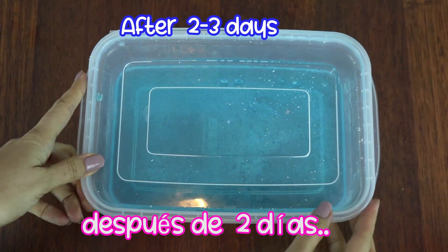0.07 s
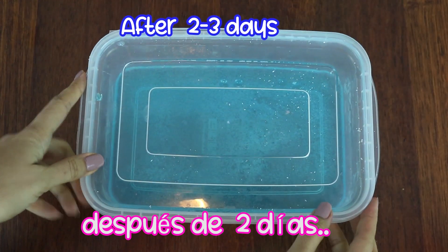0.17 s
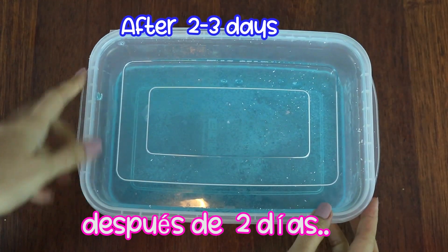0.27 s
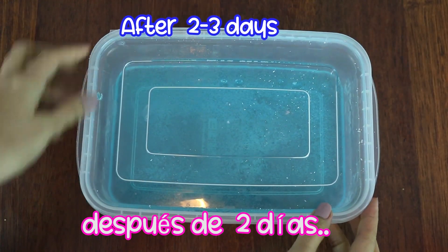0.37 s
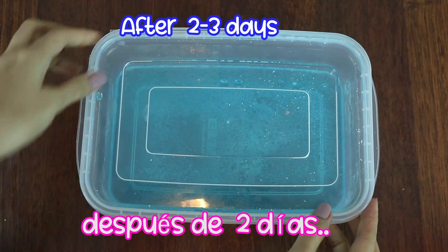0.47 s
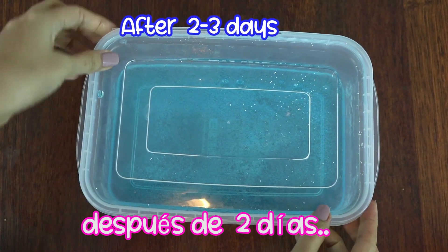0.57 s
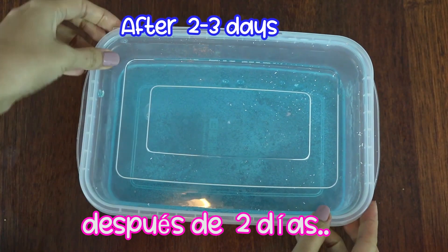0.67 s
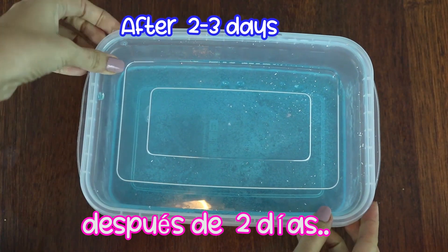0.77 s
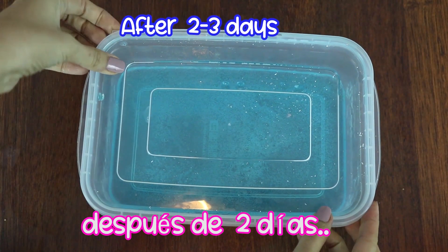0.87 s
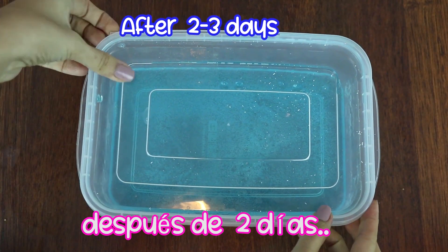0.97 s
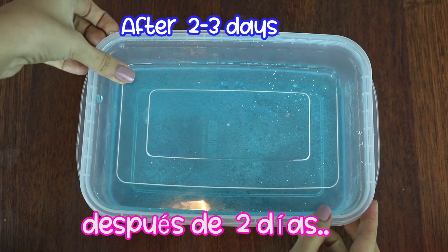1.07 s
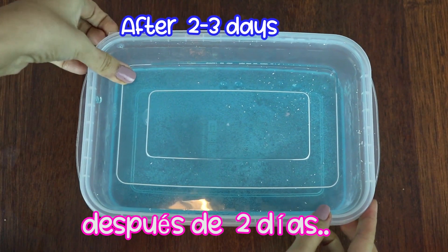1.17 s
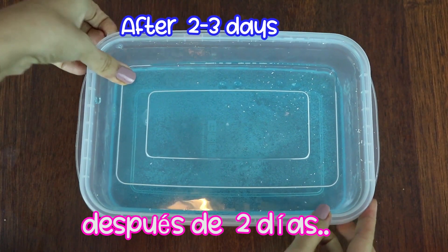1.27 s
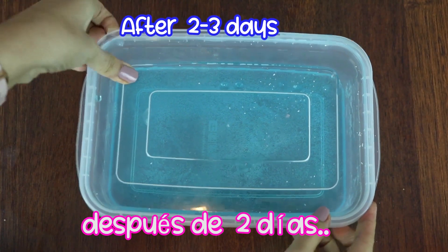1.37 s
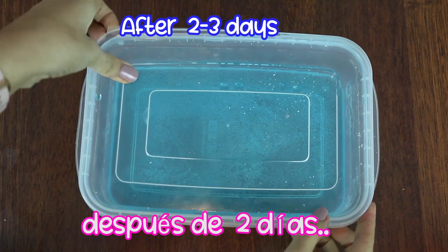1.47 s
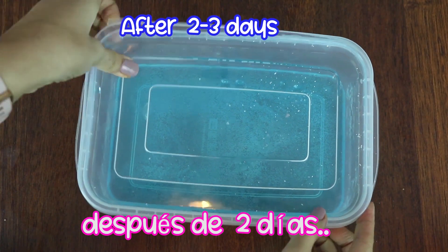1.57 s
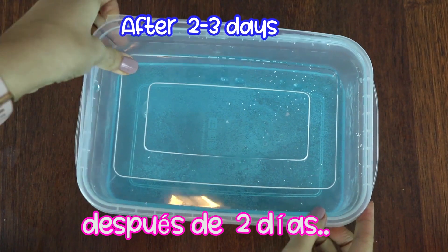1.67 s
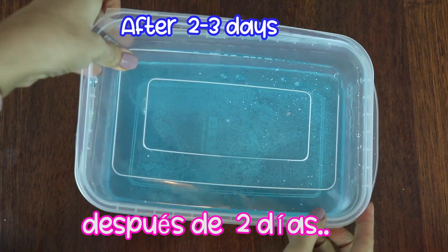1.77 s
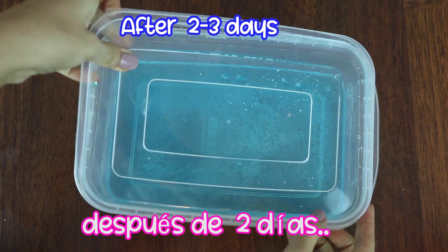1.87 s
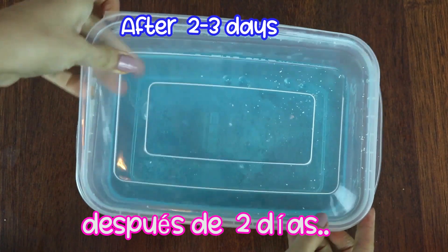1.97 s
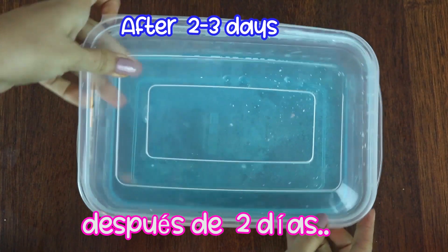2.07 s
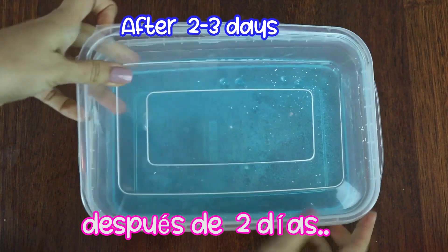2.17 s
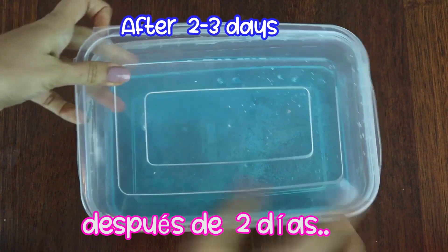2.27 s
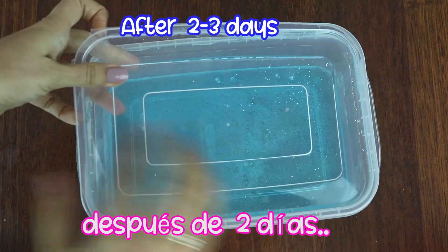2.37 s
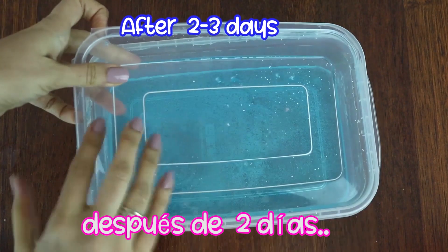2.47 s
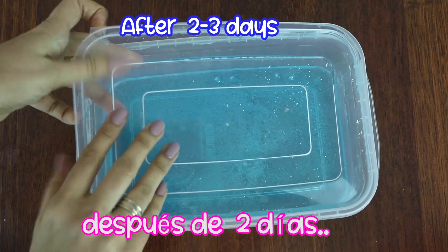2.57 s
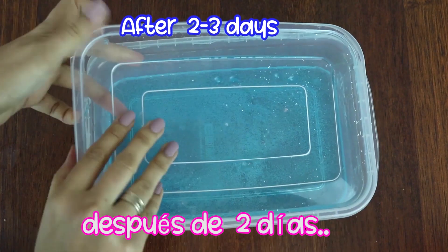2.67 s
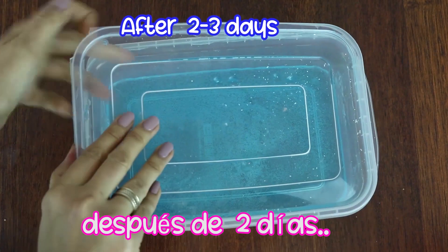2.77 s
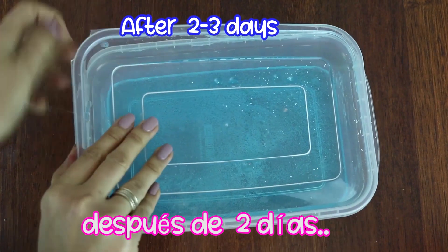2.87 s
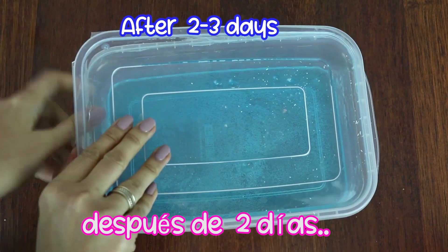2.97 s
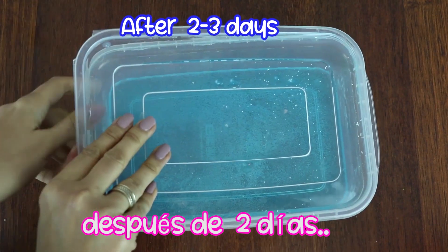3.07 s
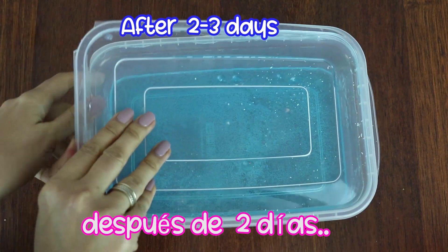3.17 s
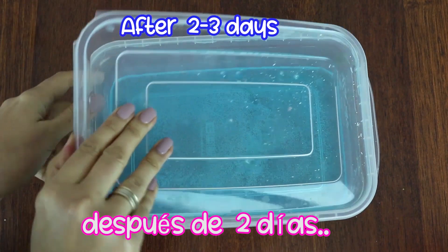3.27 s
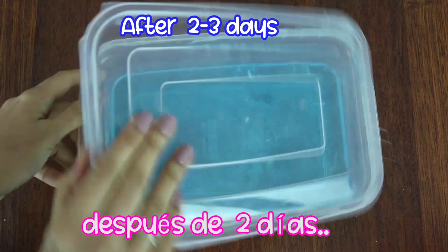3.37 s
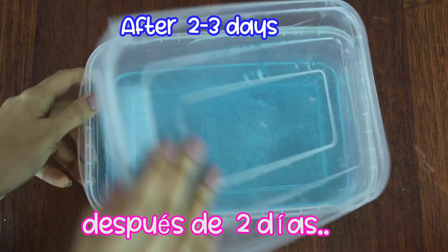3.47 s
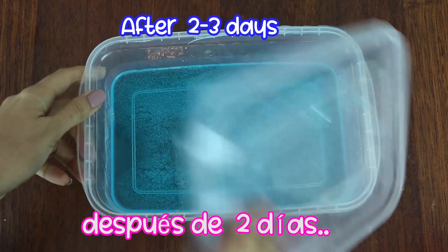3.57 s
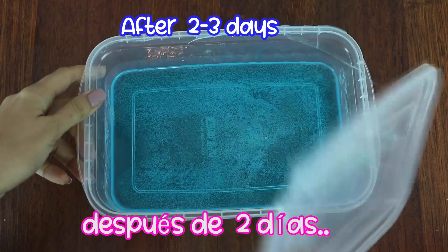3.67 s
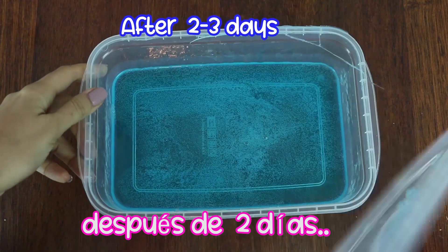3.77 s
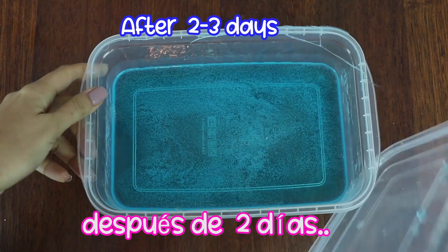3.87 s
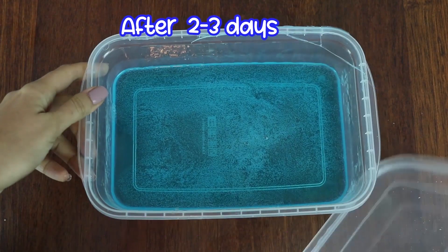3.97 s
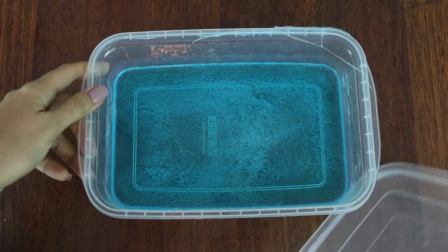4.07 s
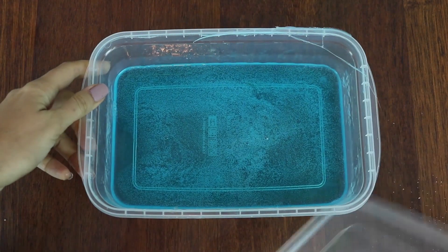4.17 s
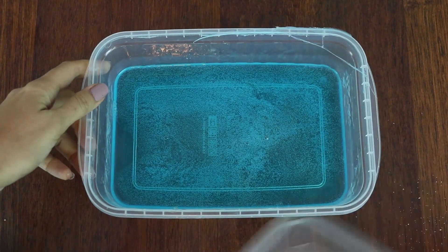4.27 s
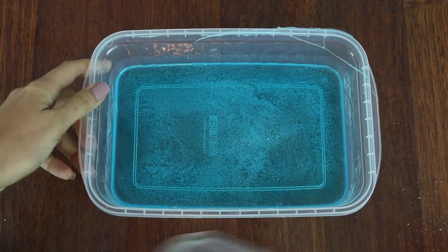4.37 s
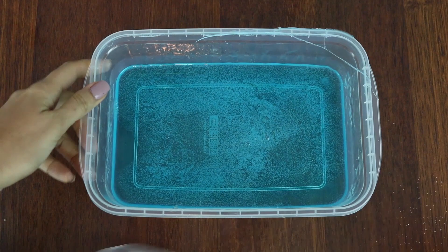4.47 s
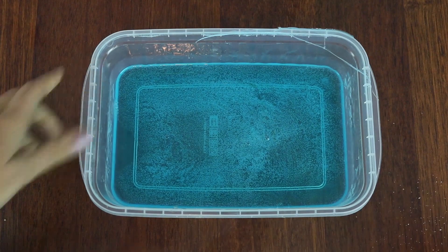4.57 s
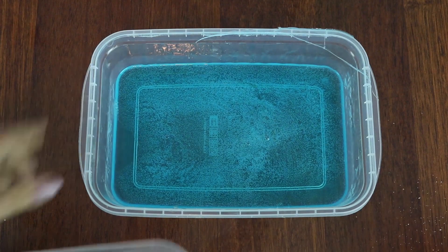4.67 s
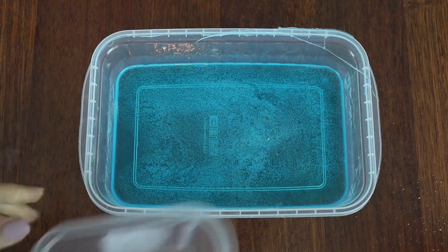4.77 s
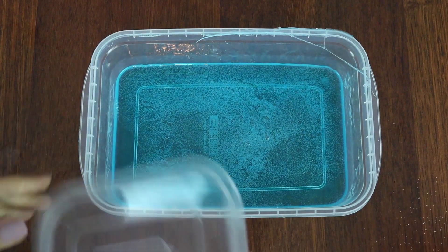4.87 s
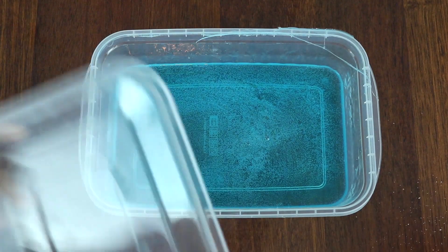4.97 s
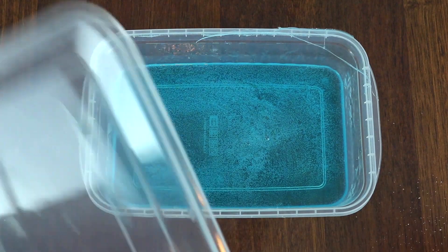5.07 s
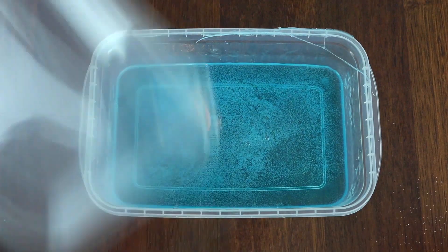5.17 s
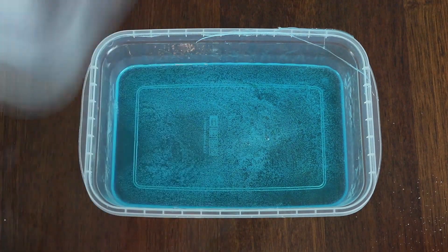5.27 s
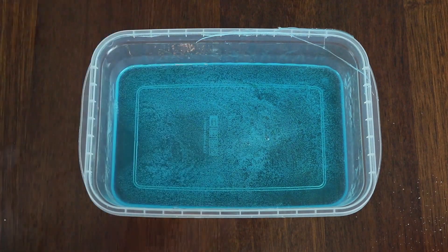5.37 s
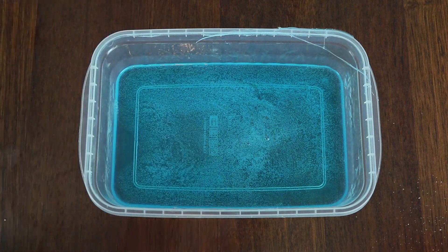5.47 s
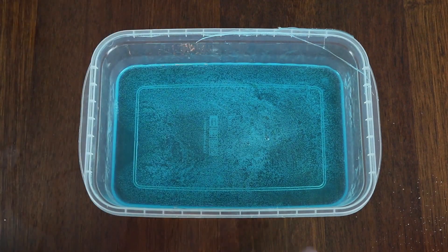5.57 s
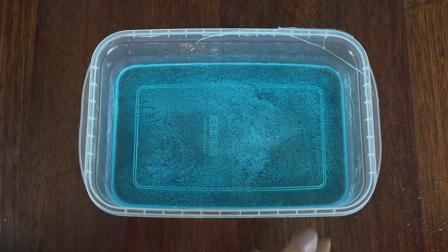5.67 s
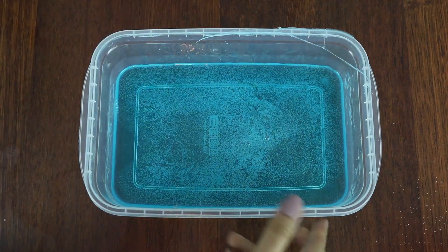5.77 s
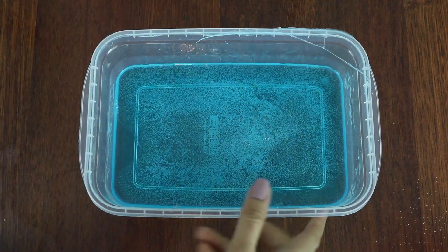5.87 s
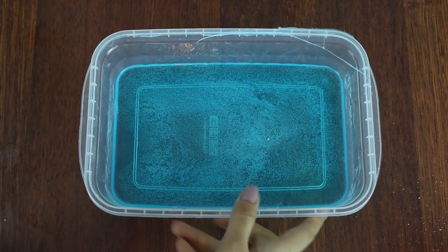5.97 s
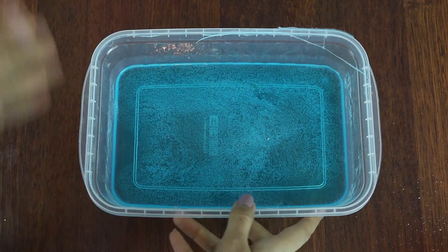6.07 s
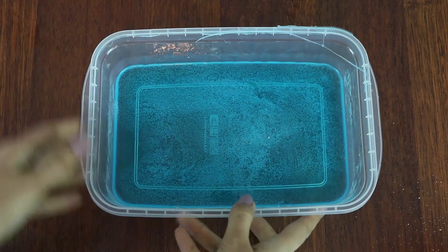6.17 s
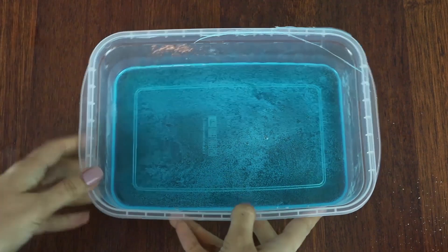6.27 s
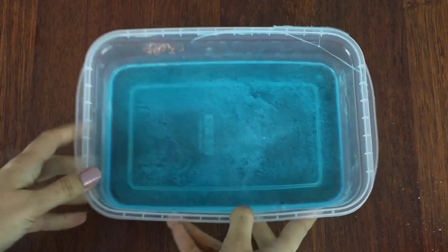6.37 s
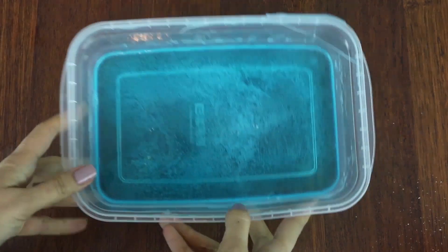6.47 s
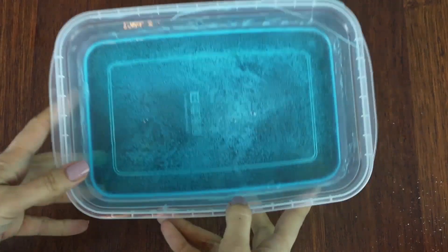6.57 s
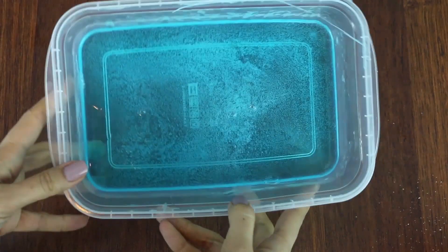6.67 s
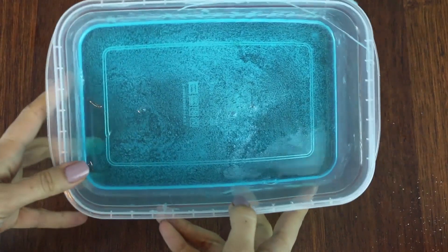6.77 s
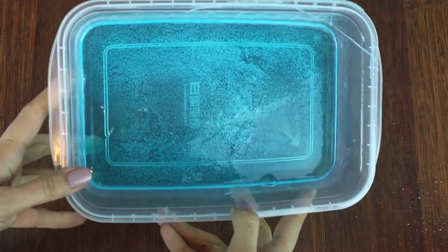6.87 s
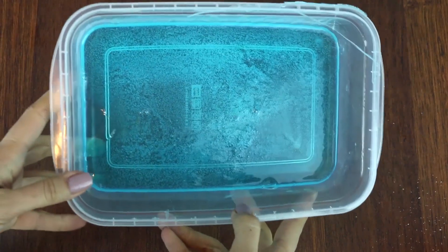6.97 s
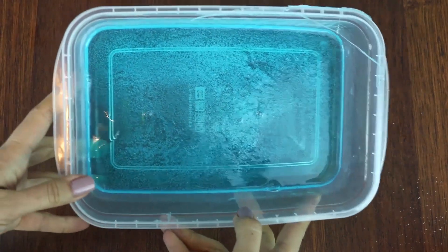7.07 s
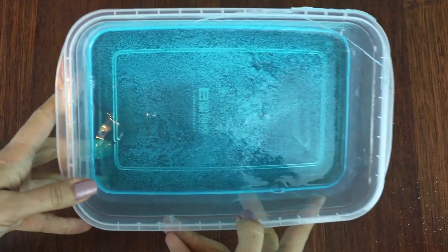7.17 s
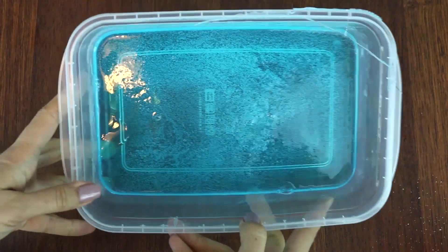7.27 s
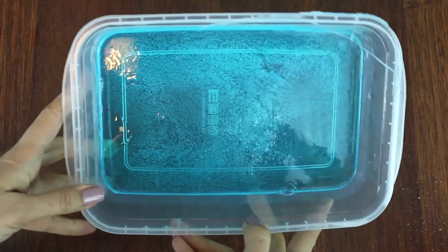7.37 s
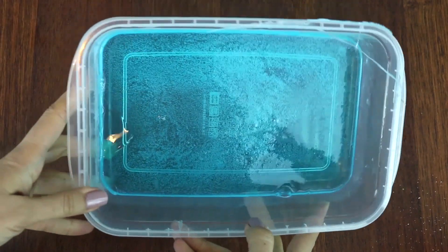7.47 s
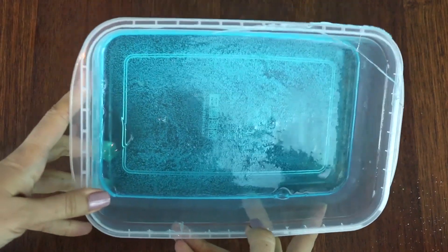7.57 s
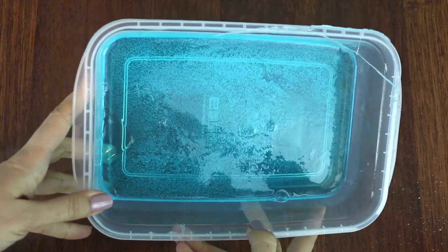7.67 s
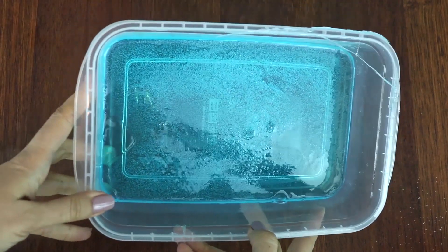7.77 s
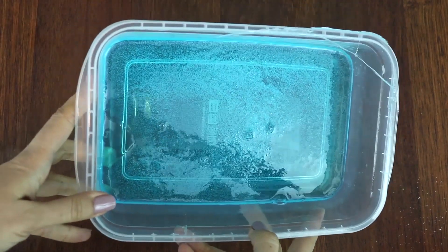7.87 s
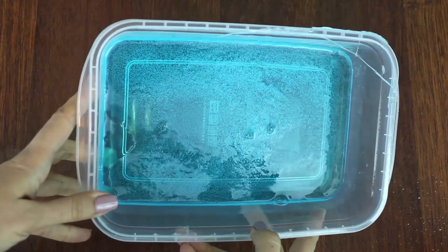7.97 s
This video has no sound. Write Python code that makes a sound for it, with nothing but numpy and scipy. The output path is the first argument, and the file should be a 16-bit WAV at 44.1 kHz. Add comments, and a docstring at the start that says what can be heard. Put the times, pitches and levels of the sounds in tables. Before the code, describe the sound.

A close microphone in a bare, hard room with low, steady hiss. From 0 to 1.5 s fingers touch a thin plastic lid: soft hollow taps, tiny ticks and faint rubbing. A firmer double pop comes at 1.6 s, small knocks around 1.9 s, and a sharper click at 2.4 s. Light fumbling continues until a short grainy squeak at 3.25 s, then the lid snaps off at 3.45 s: a very loud, slightly clipped crack with a rapid rattle lasting about a tenth of a second. Clacks at 3.6 to 3.7 s and scattered plastic knocks with skin rustle follow through 4.7 s. Softer ticks come near 5.1 s, then hard, bright clacks at 5.5 and 5.75 s, and a loud ringing double click at 5.95 s. After 6.3 s only faint rubs and tiny tub taps remain, the last near 7.9 s, over hiss.

```python
"""A snap-on lid is pried off a thin plastic tub on a wooden table, lifted away, flexed and dropped aside.
Each contact rings damped modes of lid and table, and adds noise bursts for rim click and seal crack.
Taps ring the tub wall; fingers rub the plastic as grainy stick-slip noise and squeak in narrow bands.
A bare hard room answers as decaying noise, over a quiet hiss; the input clips near full scale."""
import sys
import numpy as np
from scipy import signal
from scipy.fft import rfft, irfft, next_fast_len
from scipy.io import wavfile
from scipy.ndimage import map_coordinates

SR = 44100
rng = np.random.default_rng(int(sys.argv[2]) if len(sys.argv) > 2 else 0)


def inscribe(sig):
    """Save sig as 16-bit PCM at rate SR to the path in sys.argv[1].

    A 1-D sig is mono; a 2-D sig holds one channel per row.
    Samples are clipped to [-1, 1] before scaling.
    """
    pcm = np.round(np.clip(np.atleast_2d(sig).T, -1, 1) * 32767)
    wavfile.write(sys.argv[1], SR, pcm.astype(np.int16))


N = 353682

# Spectrum of the rim click. Each row: frequency in Hz, relative level in dB.
RIM_CLICK = [(350, -20.5), (800, -2), (1300, -2), (1900, -1.5), (2600, -8.5), (4500, -34.5)]
# Spectrum of the seal crack. Each row: frequency in Hz, relative level in dB.
SEAL_CRACK = [(1500, -39.5), (2800, 0), (4700, 3.5), (7000, -2.5), (11000, -34.5)]


def amp(db):
    """Amplitude ratio: 20 dB is a factor of ten."""
    return 10 ** (np.asarray(db) / 20)


def unit(x):
    """Normalisation by signal power: x scaled to rms 1."""
    return x / np.sqrt(np.mean(x ** 2) + 1e-20)


def along(points, hz):
    """Interpolation of (Hz, value) points on a logarithmic frequency axis."""
    f, v = np.transpose(points)
    return np.interp(np.log(hz + 1), np.log(f + 1), v)


def filtered(x, response):
    """Linear filtering: the spectrum of x times a complex response of frequency."""
    m = next_fast_len(x.shape[-1] + 8192)  # padding keeps the filter's end off the start
    hz = np.fft.rfftfreq(m, 1 / SR)
    return irfft(rfft(x, m) * response(hz), m)[..., :x.shape[-1]]


def noise(spectrum, shape):
    """Coloured noise of rms 1: white noise shaped by a spectrum of (Hz, dB)."""
    white = rng.standard_normal(shape)
    return unit(filtered(white, lambda hz: amp(along(spectrum, hz))))


def wobble(rate):
    """Slow random modulation: a smooth curve through random knots, rate knots a second."""
    knots = rng.standard_normal(int(N * rate / SR) + 4)
    return map_coordinates(knots, [np.arange(N) * rate / SR])


def stroke(start, length):
    """Envelope of sliding friction: the skin catches quickly, slides and lets go (seconds)."""
    progress = np.clip((np.arange(N) / SR - start) / length, 0, 1)
    return np.sin(np.pi * progress ** 0.86) ** .5


def ring(modes, t, attack, detune):
    """Modal synthesis: damped modes (Hz, dB, t60 s), each at a new strength and slightly detuned."""
    start_scatter = 0.6  # radians: a blow starts the modes nearly together
    hz, db, t60 = np.transpose(modes)[:, :, None]
    pitch, phase, level = rng.standard_normal((3, *hz.shape))
    swing = np.sin(2 * np.pi * hz * (1 + detune * pitch) * t + start_scatter * phase)
    strength = amp(db + 2.5 * level)
    total = (strength * amp(-60 * t / t60) * swing).sum(axis=0)
    return total / np.linalg.norm(strength) * (1 - np.exp(-t / attack))


def hush():
    """Stationary noise floor of quiet room and microphone hiss; its level drifts a little."""
    # Each row: frequency in Hz, relative level in dB per Hz.
    floor_spectrum = [(15, -52.5), (25, -16), (97, -7.5), (208, -7.5), (238, 1), (273, -11), (632, -14.5),
                      (786, -13), (1470, -18), (15200, -30), (16400, -44)]
    level_db = -55 + 0.35 * wobble(4.7)
    return amp(level_db) * noise(floor_spectrum, N)


def tail():
    """Diffuse reverberation: a noise answer of energy 1 whose frequencies each die at their own speed."""
    # Reverberation of the room. Each row: frequency in Hz, t60 in seconds.
    decay_times = [(100, 0.39), (260, 0.58), (700, 0.53), (1840, 0.76), (4850, 0.63), (12800, 0.36)]
    hz, t, bins = signal.stft(rng.standard_normal(SR), SR, nperseg=256)
    t60 = np.maximum(along(decay_times, hz), .05)[:, None]
    answer = signal.istft(bins * amp(-60 * t / t60), SR, nperseg=256)[1][:SR]
    answer *= 1 - np.exp(-np.arange(SR) / SR / 0.00043)  # the answer builds up in about 1 ms
    return answer / np.linalg.norm(answer)


def room_colour(wet):
    """Resonance: parallel band-pass resonators let some bands stand out in the room sound."""
    # Each row: centre in Hz, width in Hz, added level in dB.
    resonances = [(1840, 150, -6), (3140, 670, -1.5), (4780, 770, -2.5)]

    def response(f):
        return 1 + sum(amp(db) * 1j * f * width / (centre * centre - f * f + 1j * f * width)
                       for centre, width, db in resonances)
    return filtered(wet, response)


def rubbing():
    """Stick-slip friction: skin on plastic makes uneven rumble in the panel and a grainy rustle."""
    # Fingers resting and shifting. Each row: time in seconds, panel rumble in dB, skin rustle in dB.
    pressure = [(0, -48, -57), (.45, -60, -61), (.6, -42, -48), (1.1, -51.5, -61.5), (1.7, -34, -49),
                (2.3, -40.5, -57.5), (2.75, -46, -55.5), (3.4, -36.5, -56), (3.8, -51, -46.5),
                (4.2, -36, -45.5), (4.65, -55.5, -54), (5.1, -50, -54), (6.2, -44.5, -54),
                (6.5, -44.5, -48.5), (6.751, -64.5, -66.5), (7.3, -59, -69.5), (7.5, -61, -75.5)]
    # Short slides of skin or rim. Each row: start and length in seconds, panel rumble and skin rustle in dB.
    slides = [(0.664, 0.046, -55, -50.5), (0.936, 0.14, -57, -54.5), (1.317, 0.056, -31, -43),
              (1.706, 0.015, -20.5, -30.5), (2.108, 0.061, -32.5, -48.5), (2.83, 0.025, -39, -38.5),
              (2.952, 0.063, -38.5, -45), (3.885, 0.077, -21.5, -32), (4.265, 0.15, -38, -49),
              (4.95, 0.068, -36.5, -43), (5.142, 0.028, -39, -41)]
    # Rumble of the rubbed panel. Each row: frequency in Hz, relative level in dB per Hz.
    rumble_spectrum = [(25, -6.5), (60, -16), (110, -21.5), (190, -15.5), (270, 3.5), (430, -7.5),
                       (510, -2), (750, -8), (1300, -13), (1800, -16), (2600, -40.5), (5000, -93.5)]
    # Rustle of the skin. Each row: frequency in Hz, relative level in dB per Hz.
    rustle_spectrum = [(1100, -30), (2000, 2), (3500, -6.5), (5000, -2.5), (6700, -8.5), (8000, -9),
                       (13000, -14.5), (16000, -19.5), (17000, -63.5)]
    s, *levels_db = np.transpose(pressure)
    now = np.arange(N) / SR
    level = np.array([amp(np.interp(now, s, db, right=-120)) for db in levels_db])
    for start, length, *slide_db in slides:
        level += amp(slide_db)[:, None] * stroke(start, length)
    grip = wobble(27)  # shared by rumble and rustle
    rumble = unit(amp(0.77 * grip + 5.6 * wobble(60)) * noise(rumble_spectrum, N))
    rustle = unit(amp(2 * grip + 1.4 * wobble(210)) * noise(rustle_spectrum, N))
    return level[0] * rumble + level[1] * rustle


def squeaks():
    """Band-limited friction noise: each scrape is grainy noise in one band under a stroke."""
    # Scrapes of skin or rim. Each row: start and length in seconds, centre and width in Hz, level in dB.
    scrapes = [(1.378, 0.055, 5350, 400, -41), (1.527, 0.096, 340, 220, -27), (1.74, 0.25, 500, 200, -32),
               (2.843, 0.011, 605, 248, -28), (3.199, 0.13, 286, 87, -31), (3.234, 0.054, 586, 240, -22),
               (3.261, 0.023, 665, 160, -7.5), (3.282, .022, 690, 180, -17.5),
               (3.247, 0.059, 1675, 258, -27), (4.26, 0.15, 5000, 900, -36), (4.31, 0.12, 970, 400, -38),
               (4.346, 0.14, 1650, 506, -37.5), (6.412, 0.092, 338, 130, -39),
               (6.445, 0.064, 800, 249, -39.5), (6.534, 0.075, 808, 247, -44.5),
               (7.205, 0.21, 748, 300.5, -61)]
    white = rng.standard_normal(N)
    judder = unit(amp(2.4 * wobble(60) + 2.9 * wobble(250)))
    out = np.zeros(N)
    for start, length, centre_hz, width_hz, db in scrapes:
        band = unit(filtered(white, lambda hz: np.exp(-((hz - centre_hz) / width_hz) ** 2)))
        out += amp(db) * stroke(start, length) * band
    return judder * out


def taps():
    """Level-dependent damping: a fingertip tick rings the tub wall, and hard blows die sooner."""
    # Each row: time in seconds, level in dB, low ring and high ring in dB relative to the middle ring.
    tap_events = [(2.853, -19.5, -17, -33), (5.7468, -7, -8, -26), (5.965, 2.5, -23, -17),
                  (5.976, 10.5, -35, -22), (6.6067, -39, 4, -30), (6.624, -31.5, 1, -8.5),
                  (6.8665, -42, -5.5, -27.5), (6.9608, -44.5, 6, -25), (7.865, -32, -3.5, -24)]
    # Wall modes: two low, four middle, the rest high.
    # Each row: frequency in Hz, relative level in dB, t60 in seconds for a tap of -37 dB.
    wall_modes = [(380, 2, 0.12), (420, 0, .1), (1000, -4, .05), (1730, -1, 0.13), (1810, 2, .03),
                  (1886, -5, 0.08), (3130, -2, .025), (4700, -2, .04), (5066, -2, .13), (5350, 0, .025)]
    hard_halves_db = 31  # a tap this much harder rattles the wall and halves its ring time
    out, t = np.zeros(N + SR), np.arange(SR // 2) / SR
    for s, db, low_db, high_db in tap_events:
        shortening = 2 ** (-(db + 37.0) / hard_halves_db)
        modes = [(hz, level, t60 * shortening) for hz, level, t60 in wall_modes]
        wall = ring(modes[2:6], t, attack=0.0012, detune=0.0033)
        wall += amp(low_db) * ring(modes[:2], t, attack=0.0032, detune=0.008)
        wall += amp(high_db) * ring(modes[6:], t, attack=0.0005, detune=0.004)
        tick = amp(-11.5 - 60 * t / 0.017) * (noise(SEAL_CRACK, len(t)) + noise(RIM_CLICK, len(t)))
        out[round(s * SR):][:len(t)] += amp(db) * (wall + tick)
    return out[:N] * amp(2 * wobble(45))  # the loose wall rings unevenly


def lid_thud(centre_hz, t):
    """Modal excitation: a blow favours the panel modes near its centre; higher modes are damped faster."""
    # Modes of the lid panel: frequencies in Hz.
    panel_hz = [158, 212, 284, 267, 322, 354.3, 390, 440, 494, 492.3, 542, 608, 740, 668, 776.4, 902, 924,
                1070, 1204]
    modes = []
    for hz in panel_hz:
        level_db = -15 * np.log1p(1.6 * np.log2(hz / centre_hz) ** 2)
        modes.append((hz, level_db, 0.075 * (400 / hz) ** 0.51))
    punch = 1 + 0.93 * amp(-60 * t / 0.019)
    return ring(modes, t, attack=0.0017, detune=0.026) * punch


def table_knock(thud_db, centre_hz, t):
    """Structure-borne sound: harder and lower thuds reach the wooden top more and make it boom."""
    # Modes of the table top. Each row: frequency in Hz, relative level in dB, t60 in seconds.
    wood_modes = [(44, -12, 0.51), (64.4, -12, 0.71), (141, 2, 0.15), (180.2, -3.5, 0.46)]
    knock_db = 1.11 * thud_db - 13.5 - 8 * np.log2(centre_hz / 400)  # -8 dB per octave
    return amp(knock_db) * ring(wood_modes, t, attack=0.01, detune=0.027)


def contacts():
    """Impact excitation: direct sound and room sound of every blow of finger, rim and lid."""
    # Each row: time in seconds, rim click in dB, panel thud in dB, thud centre in Hz,
    # sharpness (fizz over click) in dB.
    blows = [(0.032, -34.5, -23, 487, -21), (0.316, -45, -33.5, 281, -27), (0.5675, -26, -16, 457, -22),
             (0.613, -42, -25.5, 500, 5), (0.718, -35, -37, 400, -11), (0.771, -54, -28, 270, -8),
             (0.838, -27, -20, 490, -49), (0.9294, -51, -30, 454, -23), (0.9982, -37, -21.5, 314, -16),
             (1.1954, -56, -23.5, 282, -11), (1.219, -40.5, -19.5, 280, -2), (1.2381, -26.5, -18, 193, -21),
             (1.4136, -27.5, -17.5, 470, -10), (1.4432, -20.5, -18.5, 465, -7.5),
             (1.603, -12.5, -19, 500, -6), (1.612, -11.5, -3, 550, -14), (1.699, -19.5, -12.5, 720, -24),
             (1.854, -34, -19.5, 600, -11), (1.881, -26.5, -14, 600, -3), (1.8854, -26, -6, 580, -7),
             (2.098, -44, -25.5, 370, -7), (2.1546, -33, -23, 560, -16), (2.249, -27.5, -17, 580, -71),
             (2.3675, -7, -8, 543, -22), (2.3759, -21, -8, 255, -28), (2.561, -50.5, -29.5, 546, -20),
             (2.794, -33, -28.5, 496, -40), (2.8565, -25, -12.5, 620, -34), (2.9504, -39, -17.5, 265, 13.5),
             (3.076, -20.5, -15.5, 486, -24), (3.245, -26, -19, 490, -21), (3.266, -17.5, -9.5, 730, -16),
             (3.2773, -21, -9.5, 726, -34), (3.294, -28.5, -20, 734, -24), (3.3357, -31.5, -27, 684, 3),
             (3.396, -35, -41, 500, -3), (3.4444, -25.5, -22, 597, -9), (3.4468, 2.5, 11, 695, -5),
             (3.4569, -4, -11, 447.6, -7), (3.467, -13, -1, 500, -14), (3.4753, 1, 1, 413, -15),
             (3.4864, -4, -4, 449, -11.5), (3.4986, -14, -7.5, 414, -19), (3.5162, -10, -1.5, 424, -11),
             (3.531, -15, -12, 400, -14), (3.634, -6, -4, 900, -11.5), (3.6395, -3.5, -6, 326, -48),
             (3.712, -10.5, -4, 370, 6.5), (3.721, -2, -6.5, 265, -19), (3.9249, -6.5, -7, 430, -5),
             (4.0744, -13.5, -5.5, 636, 1), (4.081, -38, -13, 178, -23), (4.0885, -15.5, -39, 600, -24),
             (4.1728, -18, -28, 304, -42), (4.2293, -9, -6.5, 990, -13), (4.254, -43, -12, 890, -18),
             (4.2697, -13, -7, 1100, -6), (4.4298, -21, -27, 600, -20), (4.6699, -19.5, -12.5, 446, 9),
             (4.6732, -11.5, -14, 196, -59), (4.717, -16.5, -13, 288, -44), (5.084, -25.5, -31, 514, -1.5),
             (5.0937, -23.5, -29, 192, -4), (5.101, -26, -42, 152, -28), (5.1944, -11.5, -20.5, 503, -23),
             (5.483, -1, -1, 790, -3), (5.491, 2.5, -2.5, 323, -20), (5.746, 0, -2.5, 745, -7),
             (5.941, -2.5, -18, 899, -48), (5.9669, 7, -16, 670, -3.5), (5.9752, 5.5, -3.5, 520, -11.5),
             (6.3054, -26, -23.5, 533, -20), (6.327, -46, -27, 316, -20), (6.329, -55, -36.5, 50.4, -6),
             (6.361, -41, -46, 400.4, 1), (6.5477, -55, -39, 780, -9.5)]
    # Top of the crack. Each row: frequency in Hz, relative level in dB.
    fizz_spectrum = [(5000, -27.5), (8000, -1), (12000, -9), (16000, -13.5)]
    # Loudness of the room sound, rising and falling through the scene.
    # Each row: time in seconds, gain in dB.
    room_gain = [(0, -3), (1.2, -3.5), (3.0, -2), (3.5, -4), (4.0, -1.5), (5.1, -6.5), (6.0, 2)]
    direct, wet = np.zeros(N + 2 * SR), np.zeros(N + 2 * SR)
    t = np.arange(SR * 2 // 5) / SR
    snap = (1 - np.exp(-t / 0.00021)) * (0.69 + 1.1 * amp(-60 * t / 0.0037))  # onset and early peak
    for s, click_db, thud_db, centre_hz, sharp_db in blows:
        crack_db = click_db + 0.5 + 0.31 * sharp_db  # sharper blows crack louder
        fizz_db = click_db + sharp_db
        thud = amp(thud_db) * lid_thud(centre_hz, t)
        knock = table_knock(thud_db, centre_hz, t)
        fizz = amp(fizz_db - 60 * t / 0.01) * noise(fizz_spectrum, len(t))
        click = amp(click_db - 60 * t / 0.03) * noise(RIM_CLICK, len(t))
        crack = amp(crack_db - 60 * t / 0.032) * noise(SEAL_CRACK, len(t))

        # the room answers with the smooth colour of click, crack and fizz
        def smooth_colour(hz):
            click_part = amp(click_db + along(RIM_CLICK, hz) + 9.5)
            crack_part = amp(crack_db + along(SEAL_CRACK, hz)) + amp(fizz_db + along(fizz_spectrum, hz))
            return 8.06 * np.hypot(click_part, crack_part)

        answer, at = tail(), round(s * SR)
        direct[at:at + len(t)] += thud + knock + (click + crack + fizz) * snap
        reverberant = filtered(answer, smooth_colour) + amp(-4) * signal.fftconvolve(thud, answer)[:SR]
        wet[at:at + SR] += amp(np.interp(s, *np.transpose(room_gain))) * reverberant
    return direct[:N], wet[:N]


def scene():
    """Superposition: direct sounds, the coloured room sound and the noise floor add linearly."""
    direct, wet = contacts()
    rub, wall = rubbing() + squeaks(), taps()
    wet = wet + signal.fftconvolve(amp(-6.0) * rub + amp(-5.5) * wall, tail())[:N]
    return (direct + rub + wall + room_colour(wet) + hush())[None]


def record(dry):
    """Saturation and band limiting: the input clips near full scale, then a steep low-pass follows."""
    ceiling, top_hz = .96, 16300  # fraction of full scale, Hz
    clipped = dry / (1 + np.abs(dry / ceiling) ** 30) ** (1 / 30)
    return filtered(clipped, lambda hz: 1 / (1 + (hz / top_hz) ** 80))


dry = scene()
out = record(dry)
inscribe(out)
```